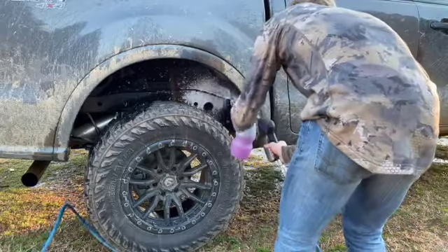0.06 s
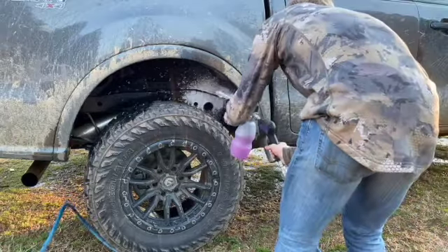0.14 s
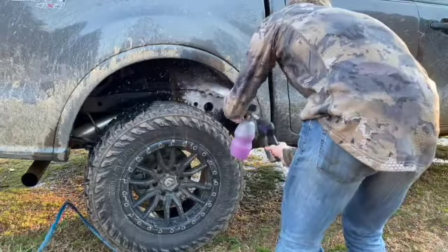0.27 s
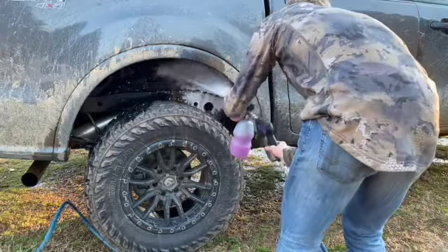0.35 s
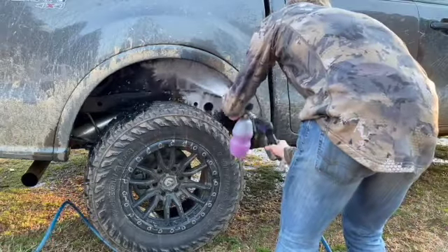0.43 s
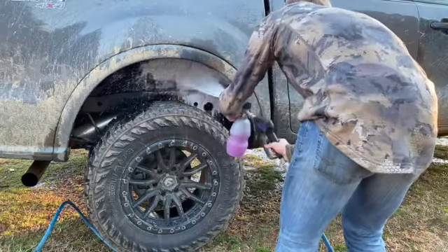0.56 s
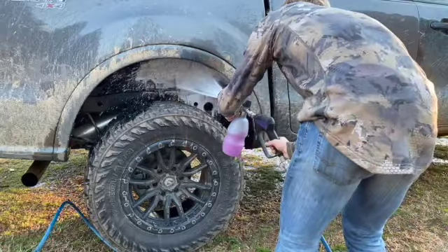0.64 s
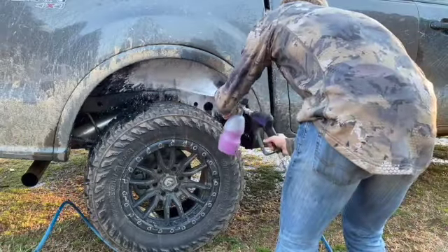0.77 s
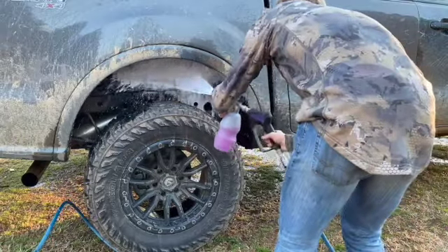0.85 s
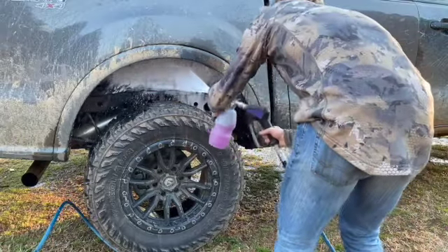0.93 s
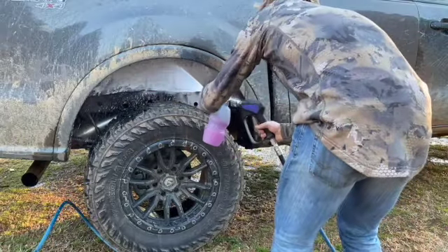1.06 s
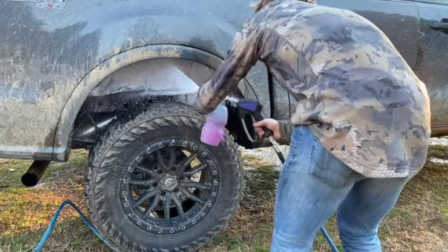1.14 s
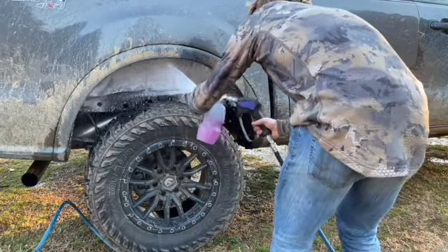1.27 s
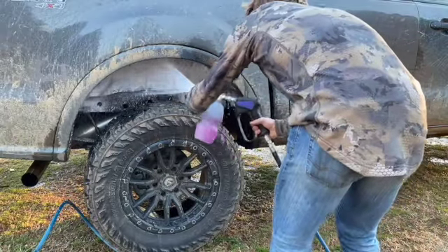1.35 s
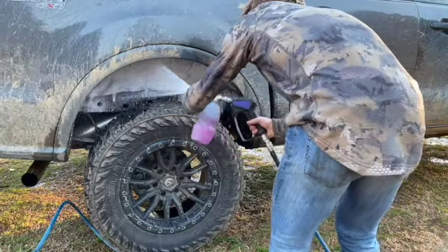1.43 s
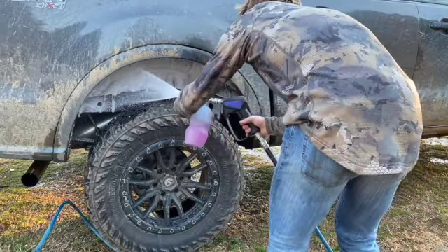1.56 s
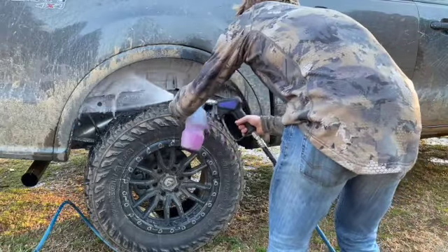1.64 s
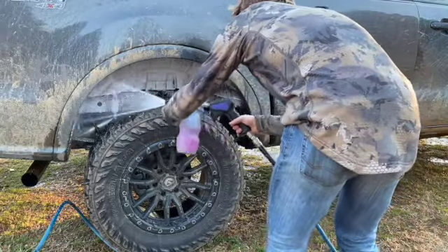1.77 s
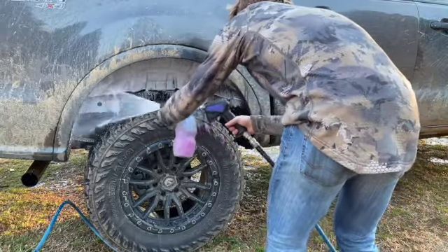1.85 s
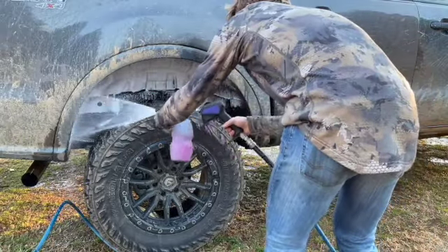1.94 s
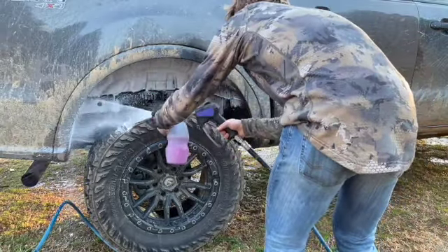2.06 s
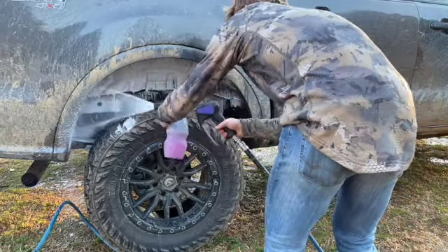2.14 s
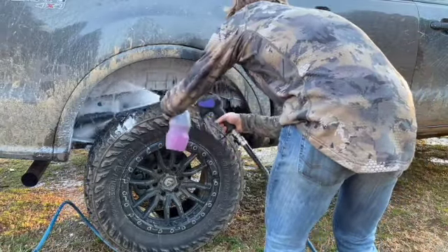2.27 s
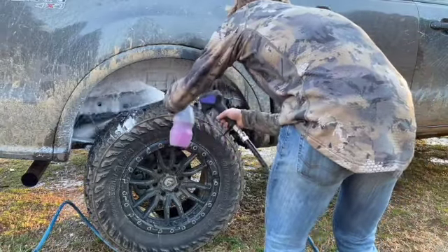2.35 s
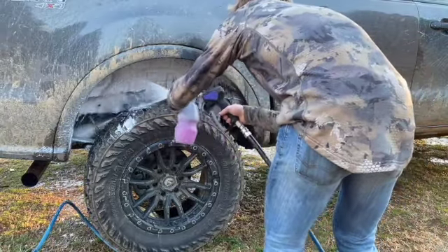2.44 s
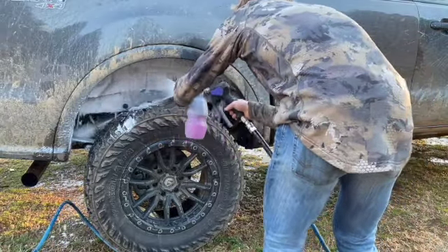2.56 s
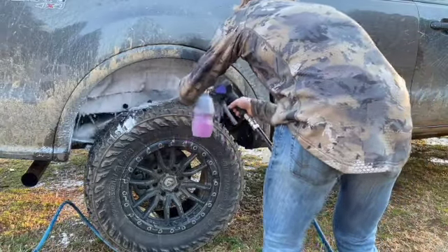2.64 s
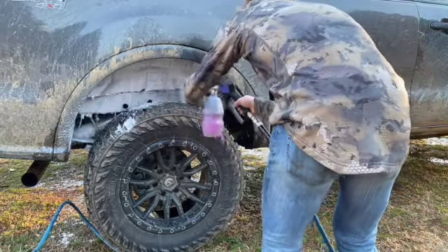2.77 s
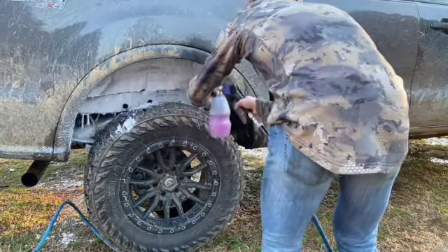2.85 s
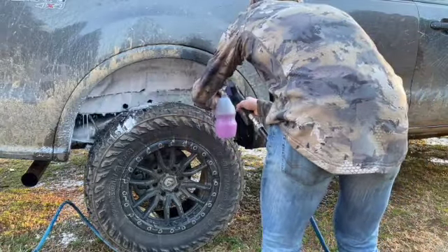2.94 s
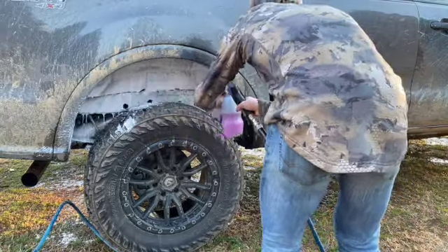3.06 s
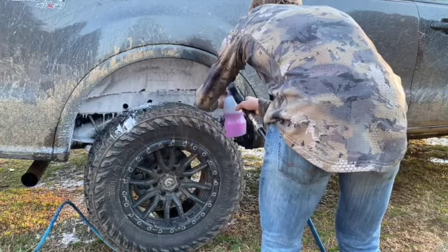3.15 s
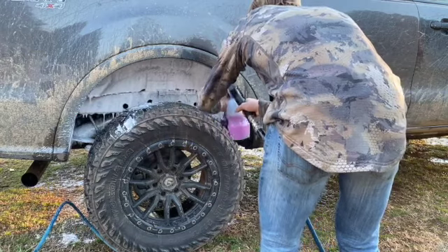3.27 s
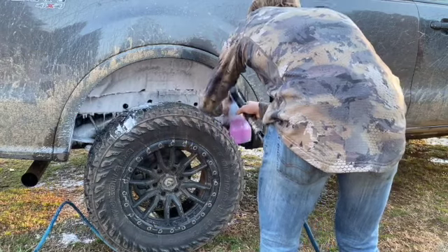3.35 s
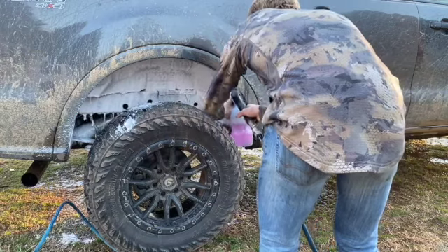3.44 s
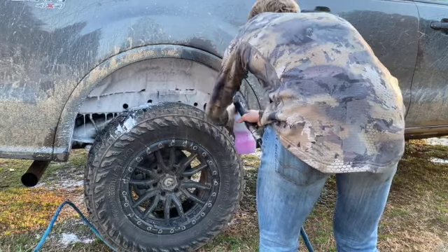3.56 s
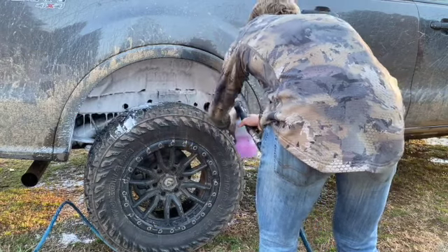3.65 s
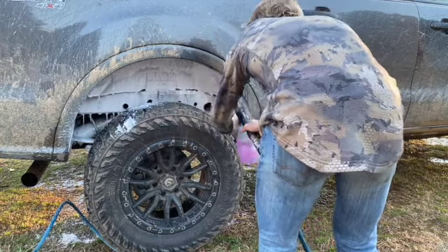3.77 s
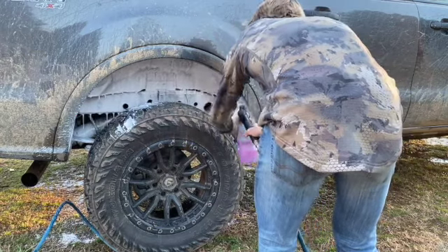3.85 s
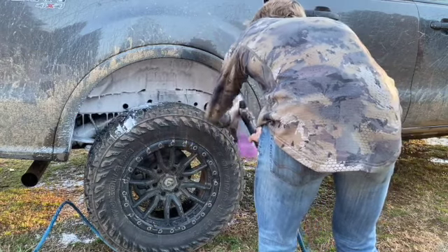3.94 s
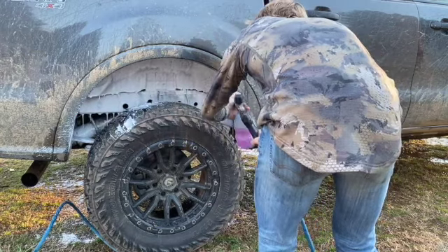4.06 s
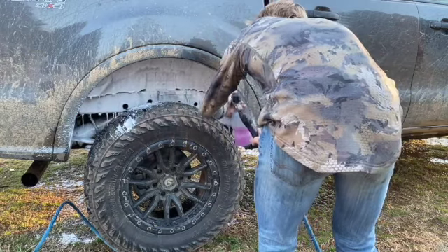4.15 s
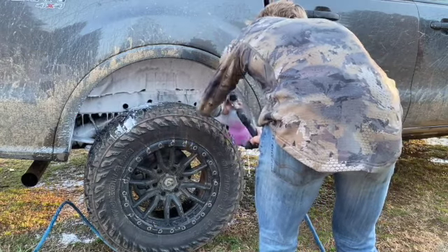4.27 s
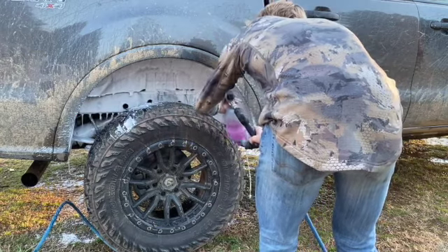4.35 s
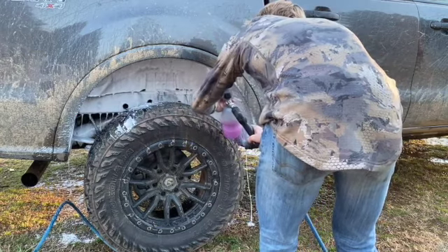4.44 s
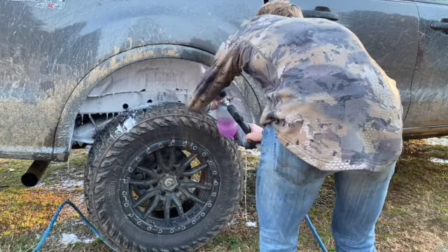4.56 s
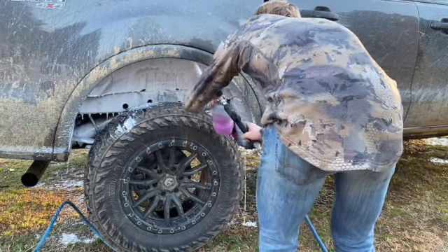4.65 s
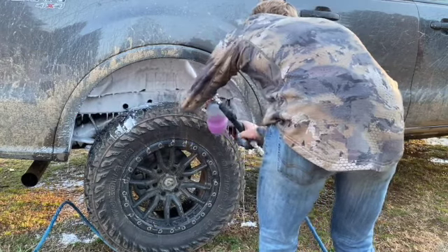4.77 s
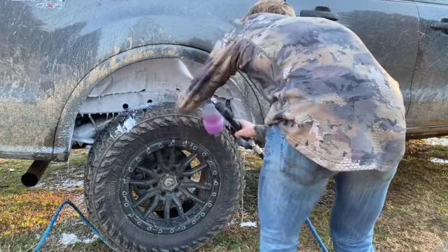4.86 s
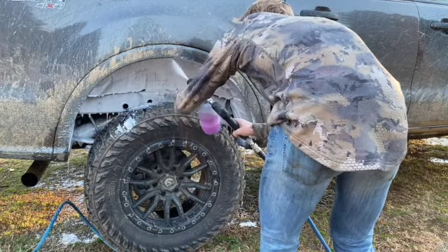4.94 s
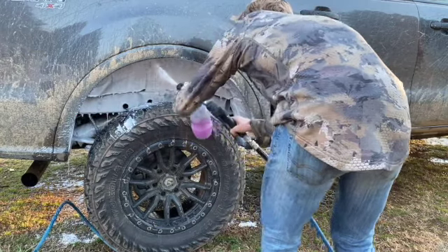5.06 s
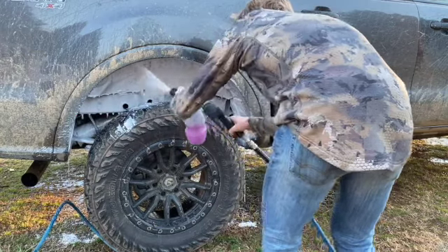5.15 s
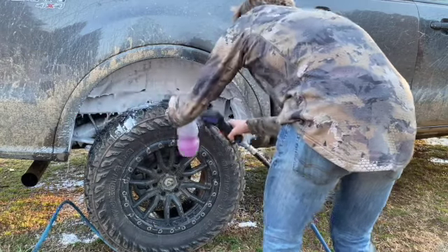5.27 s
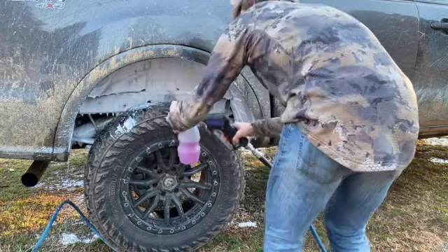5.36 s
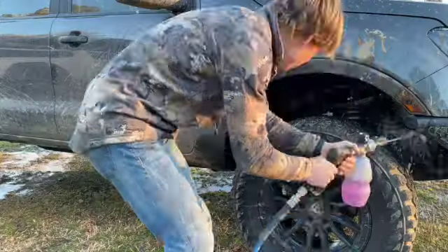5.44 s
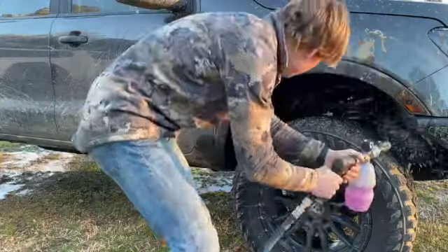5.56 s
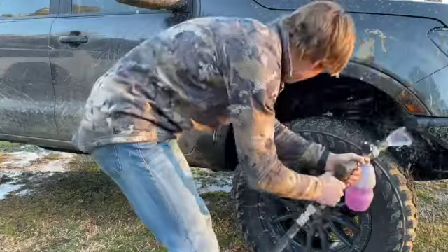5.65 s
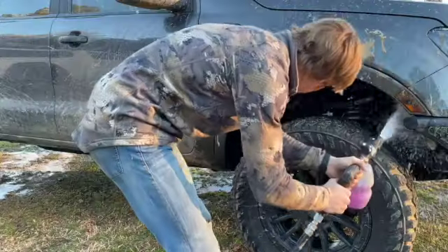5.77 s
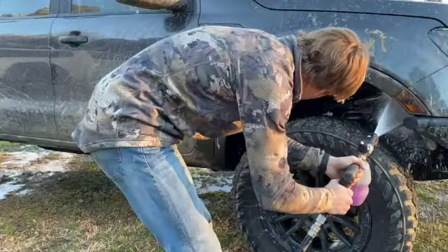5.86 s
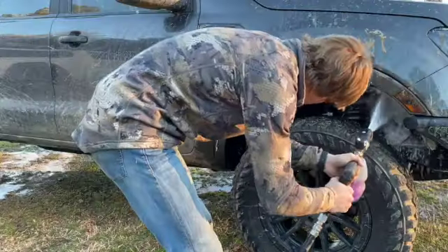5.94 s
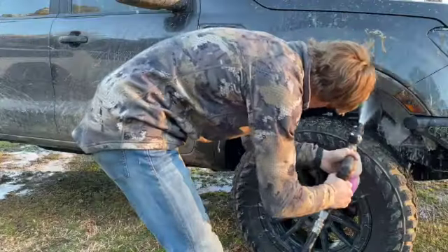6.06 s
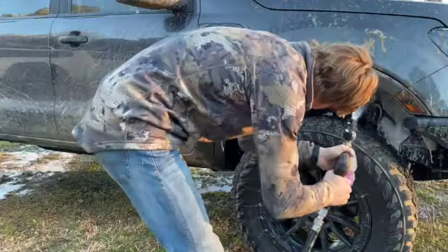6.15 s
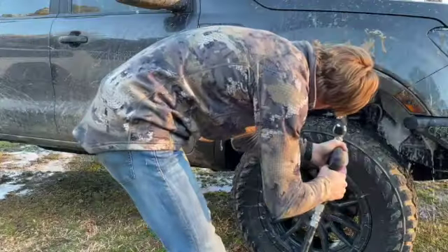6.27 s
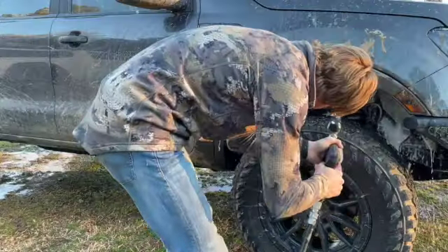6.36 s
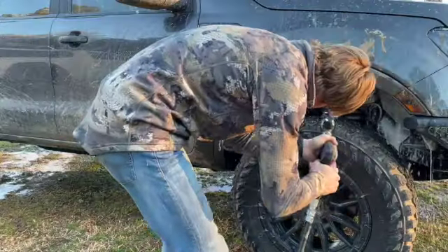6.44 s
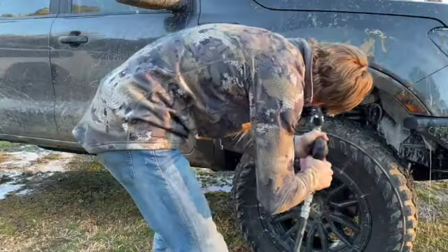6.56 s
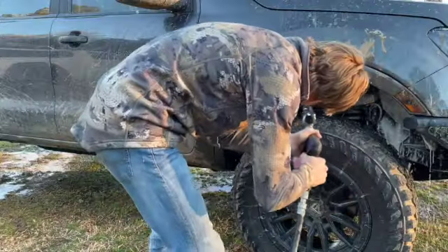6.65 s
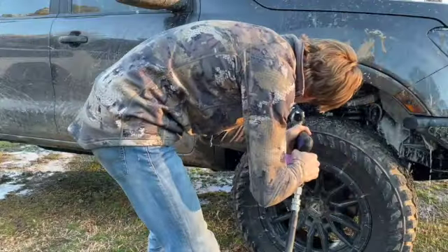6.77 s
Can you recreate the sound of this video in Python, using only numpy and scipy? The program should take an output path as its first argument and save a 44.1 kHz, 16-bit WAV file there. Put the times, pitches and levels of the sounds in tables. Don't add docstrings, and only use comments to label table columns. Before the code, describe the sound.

At 0 s there is only quiet outdoor murmur and a low pump hum. From about 0.05 s the sprayer opens in rough, stuttering steps, with a brief thin squeal near 0.3 s, reaching full force by 0.36 s. Until 5.2 s it sprays steadily: a dense bright hiss with fine mist, a slight whistle around 3.5 kHz, and foam drumming on the hollow wheel arch, the boomy resonances sliding as the aim changes, rising around 3 to 4.5 s. The pump labours low underneath. At 5.2 s the spray snaps off with a short draining tail. From 5.34 to 5.48 s small drips ping on metal in near quiet. At 5.47 s the scene changes to the front wheel; spray sputters up, squeals lightly around 5.8 s, and by 5.87 s runs full with a changed hollow colour until the end at about 6.8 s. Close, nearly central, dry outdoor phone sound.

```python
import sys
import numpy as np
from scipy import signal
from scipy.fft import rfft, irfft
from scipy.io import wavfile
from scipy.ndimage import uniform_filter1d, map_coordinates

SR = 44100
rng = np.random.default_rng(int(sys.argv[2]) if len(sys.argv) > 2 else 0)


def generate_wav(signal):
    frames = np.transpose(np.atleast_2d(signal))
    scaled = np.clip(frames, -1, 1) * 32767
    pcm = np.round(scaled).astype(np.int16)
    wavfile.write(sys.argv[1], SR, pcm)


def boost_factor(decibels):
    exponent = np.asarray(decibels, float) / 20
    return 10 ** exponent


N = 300321
T = np.arange(N) / SR
MOVE_S = 5.47
SHUT_S = 5.213, 5.195
FRAME = 1024


def unit(x):
    return x / np.sqrt(np.mean(x ** 2) + 1e-20)


def along(points, hz):
    f, v = np.transpose(points)
    return np.interp(np.log(hz + 1), np.log(f + 1), v)


def curves(rows):
    s, *cols = np.transpose(rows)
    return [np.interp(T, s, c) for c in cols]


def wobble(rate):
    knots = rng.standard_normal(int(N * rate / SR) + 4)
    return map_coordinates(knots, [np.arange(N) * rate / SR])


def wheel(rear, front):
    return np.where(np.arange(N) < MOVE_S * SR, rear, front)


def by_wheel(pair):
    return lambda hz, at: np.where(at < MOVE_S * SR, along(pair[0], hz), along(pair[1], hz))


def colour(pair):
    return lambda hz, at: boost_factor(by_wheel(pair)(hz, at))


def peak(hz, centre_hz, width_hz):
    return 1 / (1 + (2 * (hz - centre_hz) / width_hz) ** 2)


def resonance(centre_hz, width_hz, steep):
    return lambda hz, at: peak(hz, centre_hz[at], width_hz[at]) ** steep


def shaped(x, gain, size=FRAME):
    hz, t, z = signal.stft(x, SR, nperseg=size)
    at = np.minimum((t * SR).astype(int), N - 1)
    return signal.istft(z * gain(hz[:, None], at), SR, nperseg=size)[1][:N]


def blurred(field, bins, frames):
    return unit(uniform_filter1d(uniform_filter1d(field, size=bins, axis=0), size=frames, axis=1))


def rush(gain, patchy_db, streaky_db=0, source=0):
    def patched(hz, at):
        field = rng.standard_normal((2, len(hz), len(at)))
        patches = blurred(field[0], bins=8, frames=6)
        streaks = blurred(field[1], bins=3, frames=30)
        tint = gain(hz, at) * boost_factor(streaky_db * streaks)
        steady = tint / np.sqrt(np.mean(tint ** 2, axis=0))
        return steady * boost_factor(patchy_db * patches)
    return unit(shaped(rng.standard_normal(N) + source, patched))


def droplets(rate):
    return unit((rng.random(N) < rate / SR) * rng.standard_normal(N))


# time in seconds, pressure in dB under full, flow in dB under full.
PULLS = [
    [(0.045, -34.5, -29), (0.052, -27, -12), (0.09, -21.5, -11), (0.13, -18, -4.5), (0.19, -17.5, -10.5), (0.26, -15, -2.5), (0.28, -10, 0.5), (0.34, -10.5, -2), (0.36, 0, 1.5)],
    [(5.471, -45, -45), (5.477, -23.5, -14), (5.55, -33, -27), (5.58, -21.5, -6), (5.65, -16, -5), (5.7, -16, -8), (5.76, -10.5, -1), (5.8, -10.5, 0), (5.87, -1, -1.5)],
]


def trigger():
    snap_db_per_s, drain_db, drain_db_per_s, leak_db = (1001, 303), (-26.5, -23.5), (178, 86), (-40.5, -50)
    out = []
    for k, (rear, front) in enumerate(zip(*map(curves, PULLS))):
        age = np.clip(T - SHUT_S[k], 0, None)
        snap = boost_factor(-snap_db_per_s[k] * age)
        drain = boost_factor(drain_db[k] - drain_db_per_s[k] * age)
        left = snap + (drain + boost_factor(leak_db[k])) * (age > 0)
        out.append(wheel(rear + 20 * np.log10(left), front))
    return out


# frequency in Hz, level in dB per Hz.
HISS = [
    [(2290, -36), (3900, -1), (6390, 0.5), (7340, -6.5), (8300, -6.5), (10800, -16), (18300, -120)],
    [(1940, -30), (3300, -4), (3460, -3), (3960, -3), (4490, -3), (6070, 2.5), (7420, -7), (8300, -22), (10800, -29), (18300, -120)],
]
MIST = [
    [(4410, -16), (7500, -3), (11400, 0), (15100, -6), (15800, -16)],
    [(4410, -27), (7500, -0.5), (11000, -2.5), (12900, -10), (14100, -10), (15200, -13), (15800, -26)],
]
SPLASH = [
    [(500, -46), (900, -10.5), (2100, -1.5), (3200, -1), (4200, -33)],
    [(500, -38), (900, -9.5), (1900, -6), (2600, -2.5), (3300, -4.5), (4200, -22)],
]
# pitch in Hz, level in dB.
WHISTLE = [
    (3520, -36.3),
    (3900, -42.5),
]
# time in seconds, jet in view in dB, fan turned to the phone in dB,
# foam landing in view in dB, nozzle in view in dB.
AIM = [(0.36, -29, -3, -39, 2), (0.72, -27, -4.5, -35, -0.5), (1.12, -32.5, -2.5, -35.5, -0.5),
       (1.52, -32, -4.5, -35, 0.5), (1.92, -32, 1, -39.5, 0.5), (2.2, -31.5, -5, -36.5, 4),
       (2.5, -30.5, -1.5, -30, 3), (2.92, -30, 0, -36, 3), (3.15, -34, -2, -36, -3.5),
       (3.35, -35.5, -4, -40, 1), (3.8, -36.5, -3, -40, -1), (4.25, -35, -3, -39, -4.5),
       (4.52, -32, -0.5, -33.5, -2.5), (4.75, -34, 0, -39, 0), (5.15, -31.5, -4, -34, -2.5),
       (5.87, -29, -5, -34, -4), (6.2, -31, -3.5, -34.5, -3.5), (6.81, -33, -5, -36.5, 1)]


def jet(sputter, pressure_db, flow_db):
    view_db, fan_db, land_db, nozzle_db = curves(AIM)
    hiss_db = view_db + pressure_db
    weak = np.clip((-34.5 - hiss_db) / 10, 0, 1)
    drops = .35 * droplets(rate=3000)

    def dull(hz, at):
        octaves = np.log2(np.clip(hz, 3000, None) / 5000)
        return colour(HISS)(hz, at) * boost_factor(-6.5 * weak[at] * octaves)

    hiss = rush(dull, patchy_db=1.4, streaky_db=1.5, source=drops)
    mist = boost_factor(fan_db - 4.5 * weak) * rush(colour(MIST), patchy_db=0.6, streaky_db=1.8, source=drops)

    whistle_hz, whistle_db = (wheel(*pair) for pair in zip(*WHISTLE))
    whistle_hz = whistle_hz * (1 + 0.0022 * np.clip(pressure_db, -30, 0))
    whistle_db = whistle_db + nozzle_db + 0.8 * pressure_db - hiss_db
    whistle_db = whistle_db - 8 * (pressure_db < -31)
    shade_db = 0.5 * (np.arange(N) > MOVE_S * SR)
    bore = resonance(whistle_hz * (1 + .008 * wobble(6)), np.full(N, 290), steep=.8)
    broken = boost_factor(whistle_db - 1.5 + shade_db + 1.2 * wobble(7))
    whistle = broken * rush(bore, patchy_db=0.9, streaky_db=2.2, source=drops)

    splash_db = land_db + .5 * pressure_db + .36 * flow_db - hiss_db
    splash = boost_factor(splash_db) * rush(colour(SPLASH), patchy_db=0.95, streaky_db=2.0, source=drops)
    return boost_factor(hiss_db + 0.71 * sputter) * (hiss + mist + whistle + splash)


# frequency in Hz, level in dB per Hz.
BOOM = [
    [(110, -58), (180, -36), (236, -15), (345, -8.5), (498, -1), (557, -6.5), (680, 3), (880, -68), (1500, -120)],
    [(110, -55), (180, -34), (215, -17.5), (316, -10.5), (465, -4), (506, -1.5), (700, -9), (910, -33), (1540, -120)],
]
# pitch in Hz, level in dB, dB per dB of bareness,
# share of the pitch rise, dB lost per dB of missing pressure.
HOLLOW = [
    ((808, -36, 0.04, 1.02, 0.12), (704, -40, 0.6, .6, .3)),
    ((1203, -39, 0.98, .6, .45), (1120, -39.5, -.6, -.2, 1.3)),
    ((1627, -41.5, 0.6, -0.61, .22), (1680, -32.5, 0.97, 1.01, .9)),
]
# width at the rear in Hz, width at the front in Hz.
HOLLOW_WIDTHS = [
    (190, 380),
    (210, 260),
    (440, 380),
]
# time in seconds, force in dB, bareness of the liner in dB,
# nozzle depth as % rise of the hollow's pitch, nearness to the rim in dB.
SPOT = [(0.36, 1, 4, -0.5, 0.5), (0.55, 1, 5, -4, 1.5), (0.78, 0, 10, 0, 0.5), (1.1, -1.5, 11, -3.5, -1),
        (1.35, 0.5, 5, -3.5, -0.5), (1.72, -0.5, 3.5, -4, 1), (2.12, -0.5, -2, 0.5, -0.5),
        (2.52, 0, -5.5, 1, 1), (2.85, -2, -1, -5, -5), (3.05, -2, -2, 7, 1.5), (3.4, 0, 3.5, 8, -1.5),
        (3.8, 0.5, -1, 13, 3), (4.05, -2, -3.5, 7, -1), (4.5, 1.5, -2.5, 8, 2), (4.95, 0, 2, 2, -2),
        (5.8, 0, -1.5, -4, 1.5), (6.3, 1, 2.5, -0.5, 1), (6.81, -0.5, 0, 3, -1)]


def arch(sputter, pressure_db, flow_db):
    force_db, bare_db, rise, rim_db = curves(SPOT)
    null_db = wheel(-1.5 * np.clip(bare_db + 2.5, 0, None), 0)
    boom = lambda hz, at: colour(BOOM)(hz, at) * boost_factor(null_db[at] * peak(hz, 655, 150))
    sound = boost_factor(wheel(-41.5, -37.5) - .6 * bare_db) * rush(boom, patchy_db=1.0, streaky_db=-0.5)

    still_db = wheel(-7 * np.clip((T - SHUT_S[1]) / 0.017, 0, 1), 0)
    drifts = .008, .01, .012
    rims = 0.01, -.6, 0.86
    for mode, widths, drift, rim in zip(HOLLOW, HOLLOW_WIDTHS, drifts, rims):
        hz, db, bare, share, needs = (wheel(*pair) for pair in zip(*mode))
        hz = hz * (1 + share * rise / 100 + drift * wobble(3.006))
        ring = rush(resonance(hz, wheel(*widths), steep=1.3), patchy_db=1.0, streaky_db=3.3)
        db = db + bare * bare_db + rim * rim_db + needs * np.clip(pressure_db, -25, 0) + still_db
        sound = sound + boost_factor(db + 0.72 * wobble(14)) * ring
    return boost_factor(force_db + flow_db + 0.49 * sputter) * sound


# centre in Hz, width in Hz, lift in dB.
PANELS = [
    [(509, 50, 3), (640, 60, -3), (1870, 70, 4), (5180, 200, 2)],
    [(515, 70, 4), (1350, 120, -8), (1510, 70, 3), (1700, 60, 3), (1870, 70, 5), (2910, 150, 3), (4050, 110, 4)],
]


def panels(x):
    def lift_db(modes, hz):
        return sum(db * peak(hz, centre, width) for centre, width, db in modes)

    def gain(hz, at):
        return boost_factor(np.where(at < MOVE_S * SR, lift_db(PANELS[0], hz), lift_db(PANELS[1], hz)))
    return shaped(x, gain, size=2 * FRAME)


# start in seconds, pitch in Hz, level in dB, fading time in seconds.
SURGES = [
    (.283, 6300, -37, 0.24),
    (.335, 3740, -39, .13),
    (5.762, 6100, -38, 0.22),
    (5.865, 5700, -35, .35),
]


def surges():
    out = np.zeros(N)
    for s, hz, db, fade in SURGES:
        age = np.clip(T - s, 0, None) / fade
        squeal = rush(resonance(hz * (1 + .01 * wobble(12)), np.full(N, 300), steep=1.2), patchy_db=1.5)
        swell = (1 - np.exp(-30 * age)) * np.exp(-age ** 2)
        out += boost_factor(db + 1.5 * wobble(15)) * swell * squeal
    return out


# start in seconds, peak level
# in dB, pitch in Hz.
DRIPS = [(5.34, -50, 2060), (5.367, -49, 2210), (5.379, -48, 1140), (5.4136, -43, 1100),
         (5.4145, -44, 1950), (5.428, -52, 2000), (5.479, -45, 2650)]


def drips():
    out, t = np.zeros(N), np.arange(SR // 20) / SR
    for s, db, hz in DRIPS:
        ping = np.sin(2 * np.pi * hz * t)
        attack = 1 - np.exp(-t / .0006)
        out[round(s * SR):][:len(t)] += boost_factor(db - 60 * t / .022) * attack * ping
    return out


# multiple of the stroke rate, level in dB.
HUM = [
    (1, 0.5),
    (3, -0.5),
]
# frequency in Hz, level in dB per Hz.
RUMBLE = [(30, -8.5), (60, -25), (100, -16), (152, 5), (190, -11), (260, -28)]
# centre in seconds, half length in seconds, change in dB.
LABOURS = [
    (.65, 0.49, 9),
    (2.75, .3, 9),
    (5.14, .1, 15),
    (5.88, .1, 5),
    (0, .15, -7),
    (5.47, 0.18, -9),
]


def pump():
    start_db = -18 * np.clip(1 - T / 0.3, 0, 1)
    hum_db = np.interp(T, (5.26, 5.55), (-60, -72)) + start_db
    turns = np.cumsum(80.1 * (1 + 0.0041 * wobble(2.41))) / SR
    hum = 0
    for k, db in HUM:
        hum = hum + boost_factor(db + .6 * k * wobble(3)) * np.sqrt(2) * np.sin(2 * np.pi * k * turns)
    rumble_db = -63 + sum(db * np.exp(-((T - s) / half) ** 2) for s, half, db in LABOURS)
    rumble = unit(shaped(rng.standard_normal(N), colour((RUMBLE, RUMBLE)), size=8 * FRAME))
    return boost_factor(hum_db) * hum + boost_factor(rumble_db + 1.6 * wobble(5)) * rumble


# frequency in Hz, level in dB per Hz.
YARD = [(59, -55), (100, -17), (137, -10), (201, -6.5), (522, -14), (556, -25), (849, -14), (1600, -19),
        (2110, -21), (6770, -43), (15800, -39)]


def yard():
    return boost_factor(-62) * rush(colour((YARD, YARD)), patchy_db=3.0)


# frequency in Hz, left minus right in dB.
LEAN = [
    [(300, 0.5), (800, -0.3), (1500, 0.96), (5200, 1.1), (6000, 2), (7200, 3.5), (8200, -1), (9800, -1.5), (11200, -3), (12300, -2.2), (13500, 1.5)],
    [(500, 1), (1000, 1.5), (1750, 2.5), (2400, 1.5), (5400, 1.5), (6400, 2), (7300, 4.5), (8100, 2), (8700, 1.5)],
]
# frequency in Hz, side minus mid in dB.
WIDTH = [(60, -32), (200, -16), (400, -20), (800, -21.5), (1300, -36)]


def ports(mid):
    def scattered(hz, at):
        turn = np.exp(2j * np.pi * rng.random((len(hz), len(at))))
        return boost_factor(along(WIDTH, hz)) * turn

    lean = shaped(mid, lambda hz, at: np.tanh(by_wheel(LEAN)(hz, at) * np.log(10) / 40))
    lean = lean * boost_factor(1.1 * wobble(6))
    side = lean + shaped(mid, scattered)
    return np.array([mid + side, mid - side])


def scene():
    sputter = 0.53 * wobble(7) + 0.65 * wobble(40) + 0.63 * wobble(220)
    pressure_db, flow_db = trigger()
    spray = panels(jet(sputter, pressure_db, flow_db) + arch(sputter, pressure_db, flow_db))
    return ports(spray + surges() + pump() + drips() + yard())


def band_limit(x):
    return signal.sosfilt(signal.butter(12, 16320, fs=SR, output="sos"), x)


def record(dry):
    hz = np.fft.rfftfreq(N, 1 / SR)
    low_cut = 1 / np.sqrt(1 + (70 / (hz + 1)) ** 10)
    high_cut = 1 / np.sqrt(1 + (hz / 15810) ** 300)
    mix = irfft(rfft(dry) * low_cut * high_cut, N)
    return band_limit(mix)


dry = scene()
out = record(dry)
generate_wav(out)
```